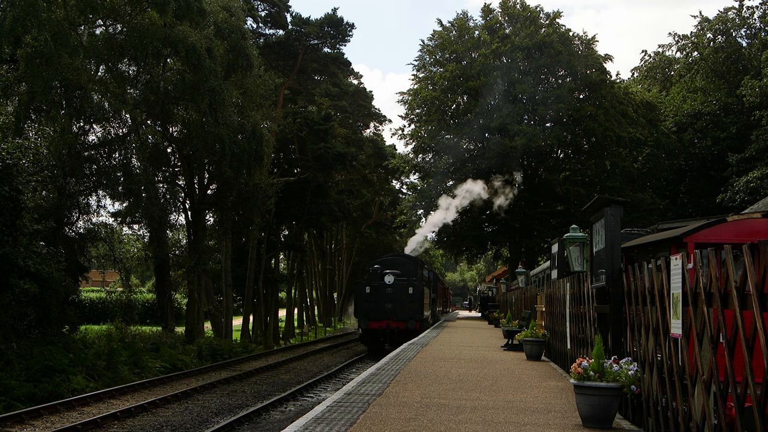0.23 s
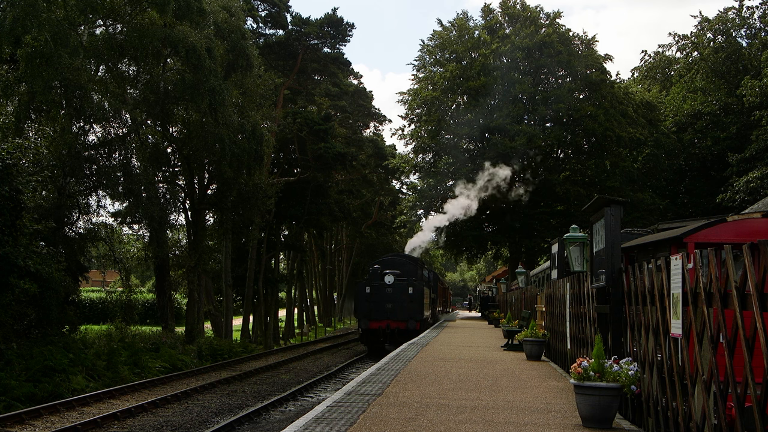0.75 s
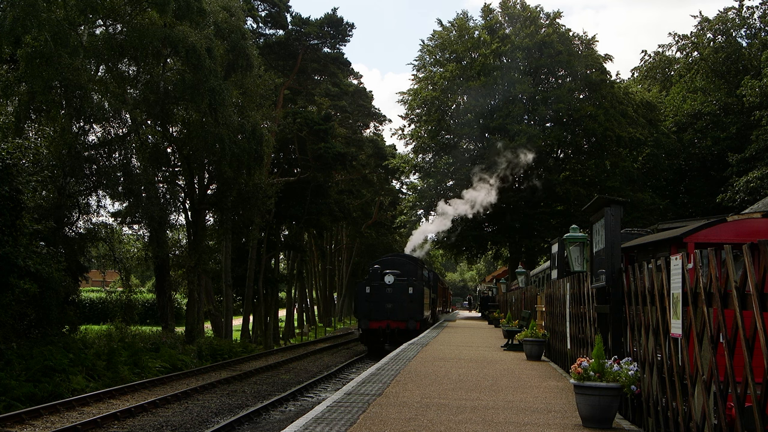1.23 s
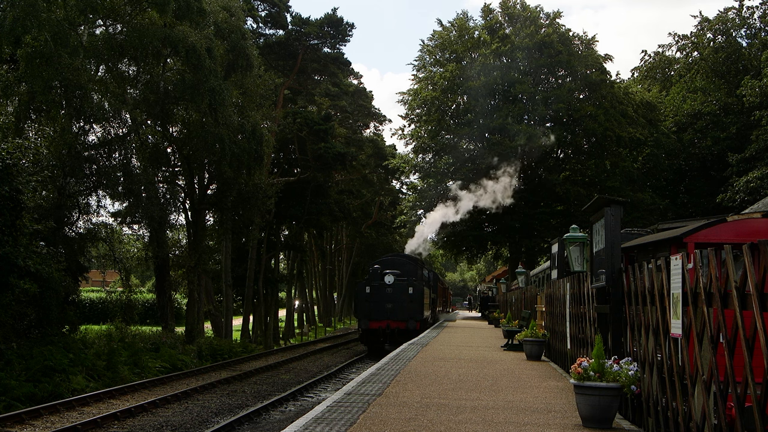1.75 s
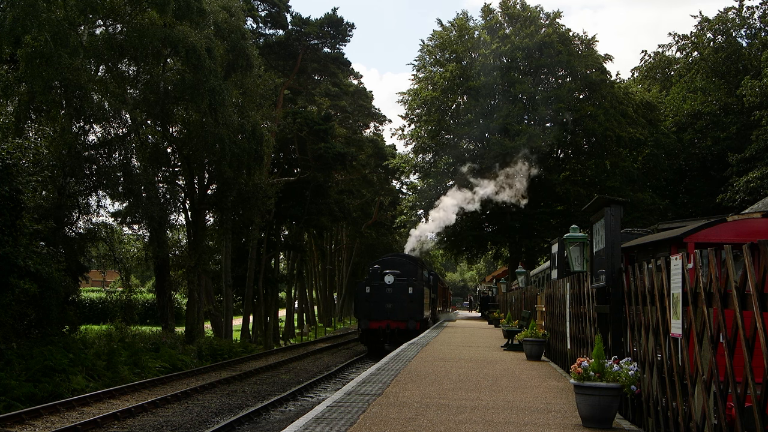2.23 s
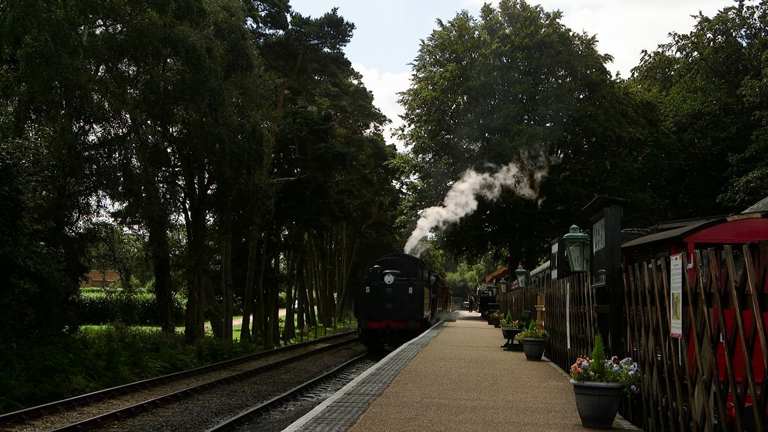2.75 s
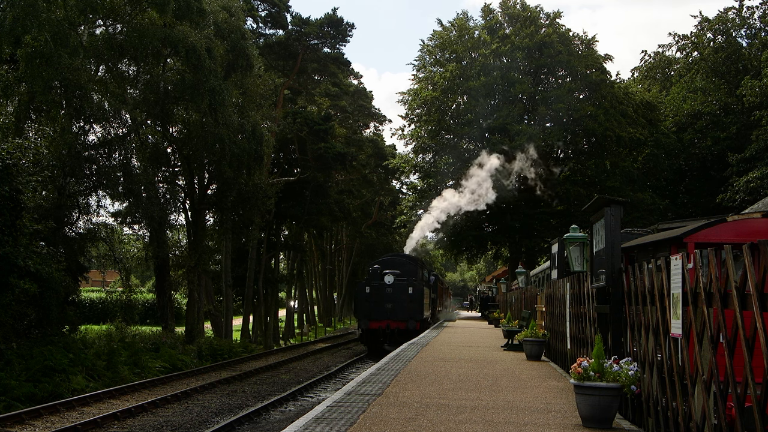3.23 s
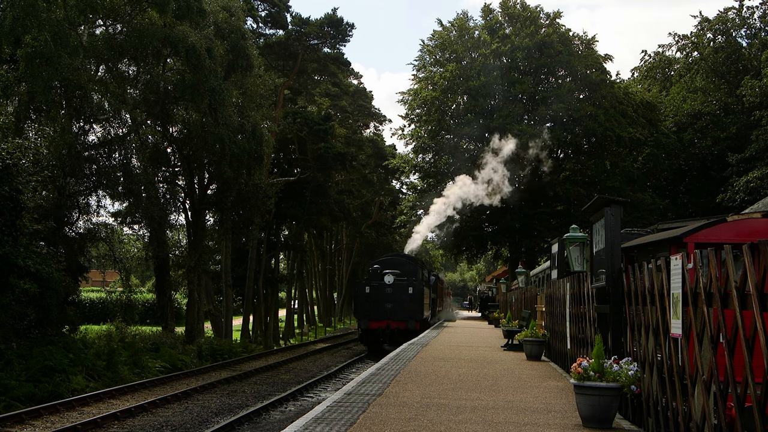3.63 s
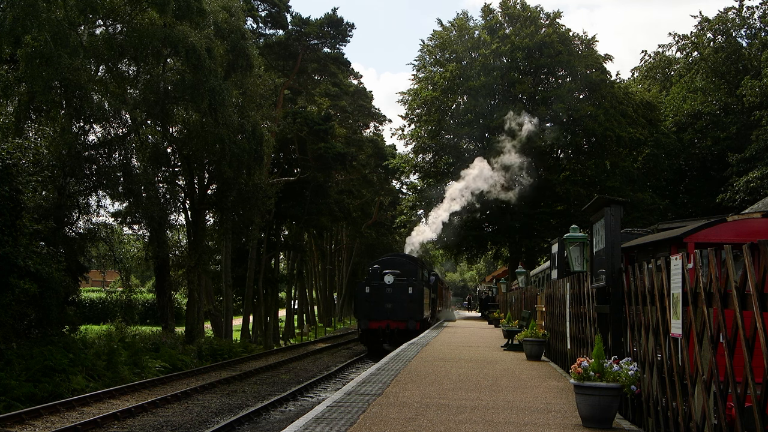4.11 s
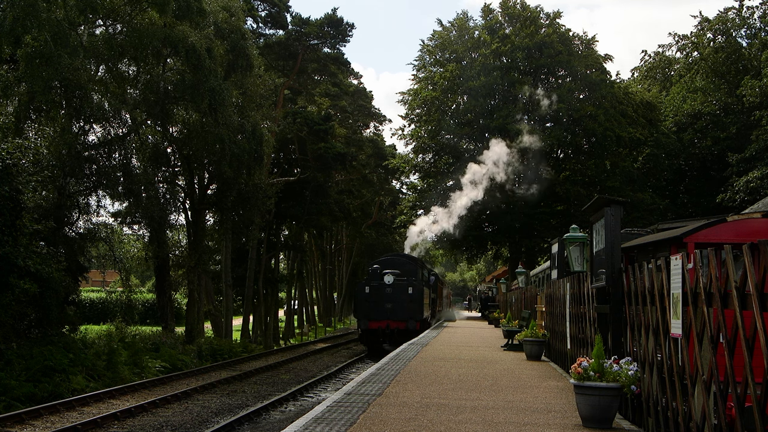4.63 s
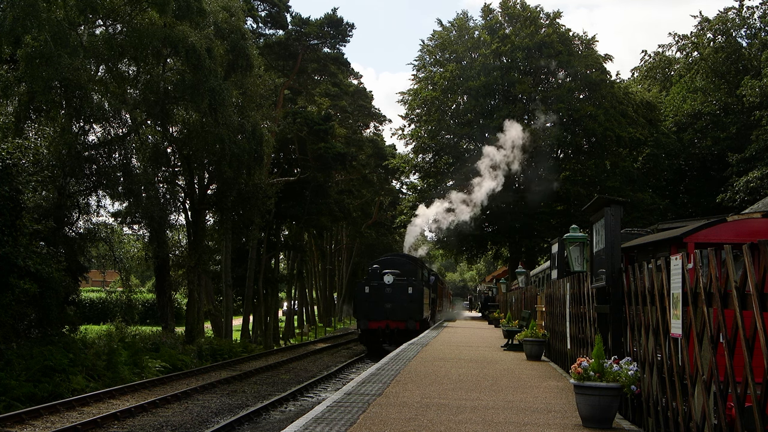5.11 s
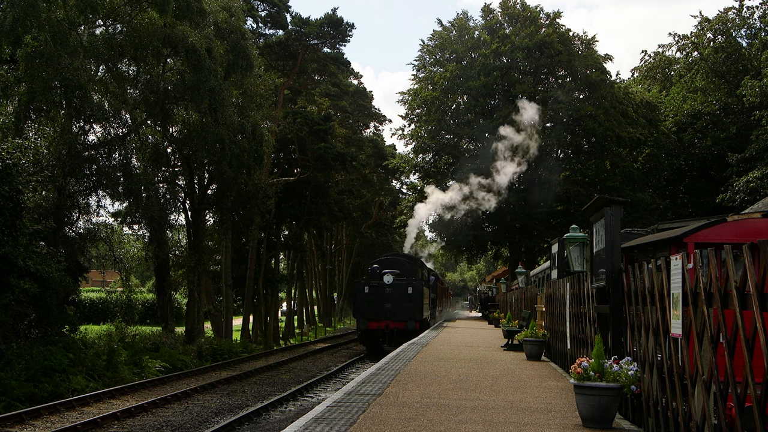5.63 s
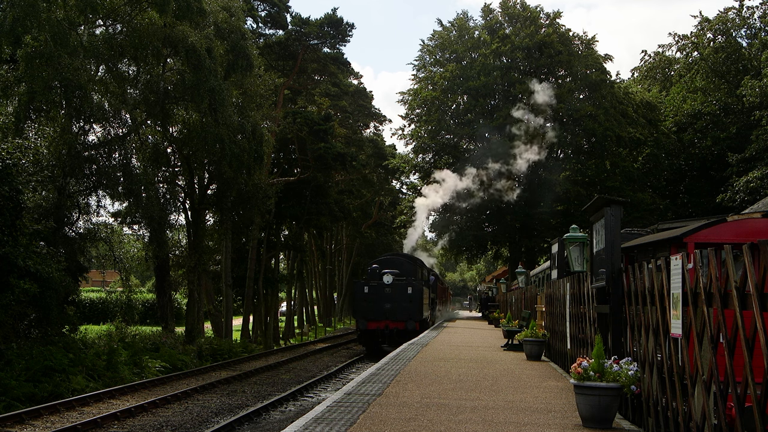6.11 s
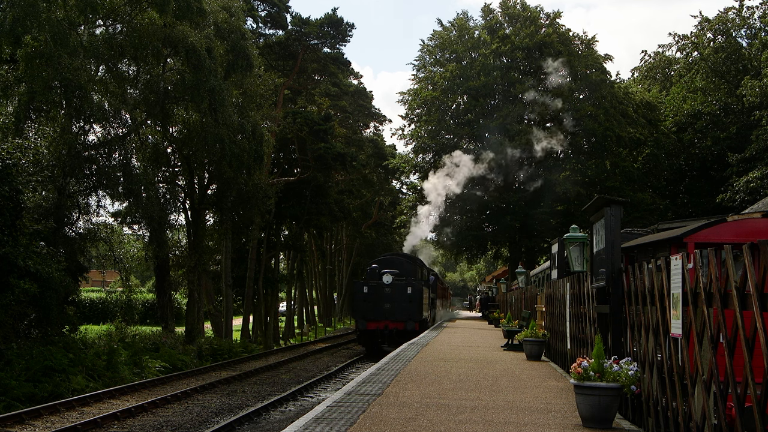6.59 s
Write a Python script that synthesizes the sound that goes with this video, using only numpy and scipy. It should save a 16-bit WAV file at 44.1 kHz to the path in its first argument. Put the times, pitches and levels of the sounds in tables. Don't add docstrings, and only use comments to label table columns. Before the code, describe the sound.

From the first instant, broad rushing steam fills an open-air railway platform, nearly steady, with slight flutter and gently drifting reflections. The valve then sinks and snaps shut around 4.7 seconds, losing treble as it goes. A diffuse tail rings out in the wood. What remains is far quieter: a low hollow draught hum, soft leaking steam that swells once, and brief, faint hooting notes. The stereo microphone stands at a moderate distance.

```python
import sys
import numpy as np
from scipy import signal
from scipy.fft import rfft, irfft, next_fast_len
from scipy.io import wavfile
from scipy.ndimage import uniform_filter1d

SR = 44100
rng = np.random.default_rng(int(sys.argv[2]) if len(sys.argv) > 2 else 0)


def decibels_to_gain(level_db):
    exponent = np.asarray(level_db, float) / 20
    return 10 ** exponent


def store_pcm(level_fs):
    pcm = np.round(np.clip(level_fs, -1, 1) * 32767).astype(np.int16)
    wavfile.write(sys.argv[1], SR, np.atleast_2d(pcm).T)


N = 302558
SIZE = next_fast_len(N)
HZ = np.maximum(np.arange(SIZE // 2 + 1) * SR / SIZE, 1.)
TIME = np.arange(N) / SR

# (frequency [Hz], level [dB per Hz])
IDLE_COLOUR = [(25, -18.4), (55, -6.5), (105, -11), (190, -0.5), (290, -3), (450, -8.5), (800, -5),
               (1700, -7), (3000, -9), (5500, -7.5), (7500, -10.5), (10000, -16.5), (13000, -22.5),
               (15700, -29)]
# (frequency [Hz], width [Hz], level [dB])
IDLE_RESONANCES = [(184, 20, 13), (207, 16, 8), (235, 16, 4), (301, 12, 10), (340, 40, -7), (402, 25, 9),
                   (491, 14, 5), (545, 30, 3), (570, 25, -4), (605, 30, 3), (740, 50, -4), (915, 150, 3),
                   (1360, 60, 4), (1480, 80, -3), (1560, 100, 4), (2082, 80, 2), (3300, 500, -2),
                   (3780, 130, 3), (4200, 150, 7.5), (4830, 160, 4), (5170, 170, 3), (9400, 300, 2),
                   (13400, 1200, 3)]
# (frequency [Hz], left minus right [dB])
IDLE_LEAN = [(60, -1), (400, 1), (1300, .6), (4400, 1.2), (9000, 1.5), (13400, 5), (15500, 1.5)]
# (frequency [Hz], unrelated share [dB])
IDLE_WIDTH = [(60, -17), (180, -32), (640, -12), (1400, -20), (3000, -14), (7000, -12), (10000, -18),
              (15000, -16)]
# (start [s], length [s], frequency [Hz], level [dB])
HOLLOW_NOTES = [
    (5.13, .14, 860, -63),
    (5.85, .15, 795, -58),
    (6.3, .14, 895, -61),
    (6.52, .1, 600, -62),
    (6.63, .1, 545, -58),
    (6.73, .11, 545, -56),
    (6.73, .12, 395, -62),
]
# (frequency [Hz], level [dB per Hz])
JET_COLOUR = [(25, -41.9), (50, -23.9), (110, -13.5), (190, -9.5), (330, -4), (700, -6.5), (950, -3),
              (2000, 0.0), (4300, -1.5), (6500, -3.5), (8500, -8.5), (10500, -11), (13000, -15.0),
              (15700, -24.5)]
# (frequency [Hz], width [Hz], level [dB])
JET_REFLECTIONS = [(125, 20, 4), (226, 20, 3), (244, 15, -6), (285, 28, 7.5), (322, 18, 3), (370, 40, -2),
                   (452, 22, 6), (501, 16, 4.5), (663, 20, 2.5), (773, 22, 4), (860, 50, -2), (917, 16, 7),
                   (1003, 25, 3), (1130, 15, 5), (1155, 16, -5), (1198, 22, 2), (1884, 25, 5),
                   (2193, 30, 3), (2400, 100, -3), (2634, 32, 4), (3080, 80, -2), (3241, 20, 3),
                   (3506, 27, 2), (4272, 70, 4), (4430, 80, 3), (7036, 40, 3.5), (9800, 1200, 1),
                   (11200, 900, -1.5)]
# (frequency [Hz], left minus right [dB])
JET_LEAN = [(60, 0), (400, .8), (1800, .3), (2250, 1.9), (2700, .7), (3300, 1.7), (3750, .4), (4100, 2.1),
            (4900, .7), (6100, 3), (8000, 2.2), (10500, .8), (13400, 5.2), (15500, 2)]
# (frequency [Hz], unrelated share [dB])
JET_WIDTH = [(60, -41), (300, -31), (450, -17.5), (1100, -25), (1700, -31), (2300, -17.5), (6000, -16),
             (9000, -19), (14000, -16)]

IDLE_DB = -46.5
PUFF_S, PUFF_LENGTH_S, PUFF_DB = 6.1, .25, 1.9
OPEN_DB, SWELL_DB, SWELL_S = -23.05, -.9, 1.3
LAST_SURGE_S, LAST_SURGE_LENGTH_S, LAST_SURGE_DB = 4.1, .35, .5
SAG_S, SAG_DB_PER_S = 4.4, 20.5
SEAT_S, SEAT_DB_PER_S, EASE_S = 4.66, 105, .03
BASS_DB, TREBLE_DB = .7, .9
EDGE_SWELL = .9
TREBLE_LOSS, TREBLE_MOST_DB = 1.1, 16
BASS_LOSS, BASS_MOST_DB, BASS_HOLDS_DB = 1.2, 4, 1.6
SING_HZ, SING_START_HZ, SING_SINK_S = 9400, 10150, .6
SING_DB, SING_ON_S, SING_OFF_S, SING_REST_DB = -43, .3, 1.35, -7
WOOD_T60_S, WOOD_DB, WOOD_TOP_HZ = 1.8, -18.7, 4000


def on_hz(table):
    hz, value = np.transpose(table)
    return np.interp(np.log(HZ), np.log(hz), value)


def ripple(peaks):
    return sum(db / (1 + (2 * (HZ - hz) / width) ** 2) for hz, width, db in peaks)


def walk(rate):
    hold = int(SR / rate)
    steps = np.repeat(rng.standard_normal(N // hold + 1), hold)
    smooth = uniform_filter1d(uniform_filter1d(steps, hold), hold)
    return 1.3 * smooth[:N]


def pair(colour_db, spread, balance):
    mid, side = rfft(rng.standard_normal((2, SIZE)))
    sign = np.array([[1], [-1]])
    gain = decibels_to_gain(colour_db + sign * on_hz(balance) / 2)
    return gain * (mid + sign * decibels_to_gain(on_hz(spread)) * side)


def bands(spectra):
    for hz in 31.25 * 2. ** np.arange(10):
        octaves_off = np.clip(np.log2(HZ / hz), -1, 1)
        weight = np.cos(np.pi * octaves_off / 2) ** 2
        yield hz, irfft(spectra * weight, SIZE)[:, :N]


def idle(flicker_db=.4):
    puff_db = PUFF_DB * np.exp(-((TIME - PUFF_S) / PUFF_LENGTH_S) ** 2)
    spectra = pair(on_hz(IDLE_COLOUR) + ripple(IDLE_RESONANCES), IDLE_WIDTH, IDLE_LEAN)
    out = 0
    for hz, band in bands(spectra):
        leak_share = np.clip(np.log2(hz / 4000) / 1.2, 0, 1)
        out = out + band * decibels_to_gain(leak_share * puff_db + flicker_db * walk(5))
    return out * decibels_to_gain(IDLE_DB) / np.sqrt(np.mean(out ** 2))


def hollow_notes(waver=0.0142):
    out = np.zeros(N)
    bent_time = np.cumsum(1 + waver * walk(25)) / SR
    for start, length, hz, db in HOLLOW_NOTES:
        swell = np.sin(np.pi * np.clip((TIME - start) / length, 0, 1))
        out += decibels_to_gain(db) * swell * np.sin(2 * np.pi * hz * bent_time)
    return np.sqrt(2) * out


def wood(x):
    t = np.arange(int(1.8 * SR)) / SR
    shared, left, right = rng.standard_normal((3, len(t)))
    decay = np.exp(-np.log(1000) * t / WOOD_T60_S)
    build_up = np.clip(t / 0.056, 0, 1)
    tail = (shared + .5 * np.array([left, right])) * decay * build_up
    tail = signal.sosfilt(signal.butter(1, [300, WOOD_TOP_HZ], "band", fs=SR, output="sos"), tail)
    tail = tail / np.sqrt(np.sum(tail ** 2, axis=1, keepdims=True))
    return decibels_to_gain(WOOD_DB) * signal.fftconvolve(x.mean(axis=0, keepdims=True), tail, axes=1)[:, :N]


def echoes(x, echo_db=-17.5, drift_ms=.15, longest_ms=45, count=6):
    bright = signal.sosfilt(signal.butter(2, 800, "high", fs=SR, output="sos"), x)
    late = 0
    for lag_ms in rng.uniform(4, longest_ms, count):
        delay = np.round((lag_ms + drift_ms * walk(1.514)) * SR / 1000)
        source = np.abs(np.arange(N) - delay).astype(int)
        late = late + decibels_to_gain(echo_db) * bright[:, source]
    return (x + late) / np.sqrt(1 + count * decibels_to_gain(2 * echo_db))


def closing_db():
    def seconds_past(start):
        return EASE_S * np.logaddexp(0, (TIME - start) / EASE_S)

    return SAG_DB_PER_S * seconds_past(SAG_S) + SEAT_DB_PER_S * seconds_past(SEAT_S)


def whistle(width_hz=130, fade_s=.35):
    hz = SING_HZ + (SING_START_HZ - SING_HZ) * np.exp(-TIME / SING_SINK_S)
    outside = np.clip(np.maximum(SING_ON_S - TIME, TIME - SING_OFF_S) / fade_s, 0, 1)
    low_pass = signal.butter(2, width_hz / 2, fs=SR, output="sos")
    slow = signal.sosfilt(low_pass, rng.standard_normal((2, N)))
    carrier = np.exp(2j * np.pi * np.cumsum(hz) / SR)
    tone = np.real((slow[0] + 1j * slow[1]) * carrier)
    return tone / np.std(tone) * decibels_to_gain(SING_DB + SING_REST_DB * outside - 2 * closing_db())


def jet(flicker_db=0.64, patchy_db=0.29):
    shut_db = closing_db()
    flare_db = LAST_SURGE_DB * np.exp(-((TIME - LAST_SURGE_S) / LAST_SURGE_LENGTH_S) ** 2)
    swell_db = SWELL_DB * np.exp(-TIME / SWELL_S) + flare_db
    main_db = OPEN_DB + swell_db - shut_db
    treble_loss_db = np.minimum(TREBLE_LOSS * shut_db, TREBLE_MOST_DB)
    bass_loss_db = np.clip(BASS_LOSS * (shut_db - BASS_HOLDS_DB), 0, BASS_MOST_DB)
    treble_db = TREBLE_DB + EDGE_SWELL * swell_db - treble_loss_db
    bass_db = BASS_DB + EDGE_SWELL * swell_db - bass_loss_db

    spectra = pair(on_hz(JET_COLOUR) + ripple(JET_REFLECTIONS), JET_WIDTH, JET_LEAN)
    core = (HZ > 1000) & (HZ < 5000)
    spectra = spectra * SIZE / np.sqrt(2 * np.sum(abs(spectra.mean(axis=0)[core]) ** 2))

    eddies = walk(200)
    flutter_db = flicker_db * (eddies - uniform_filter1d(eddies, SR // 20))
    out = 0
    for hz, band in bands(spectra):
        high = (np.clip(np.log2(hz / 2000), 0, 3) / 3) ** 3.2
        low = np.clip(np.log2(1200 / hz) / 1.4, 0, 1)
        tilt_db = high * treble_db + low * bass_db
        out = out + band * decibels_to_gain(tilt_db + (1 - low) * flutter_db + patchy_db * walk(3.98))
    return out * decibels_to_gain(main_db)


def scene():
    steam = echoes(jet() + whistle())
    return idle() + hollow_notes() + wood(steam) + steam


def top_cut(x):
    return signal.sosfilt(signal.butter(12, 15840, fs=SR, output="sos"), x)


def record(dry):
    return top_cut(dry)


dry = scene()
out = record(dry)
store_pcm(out)
```